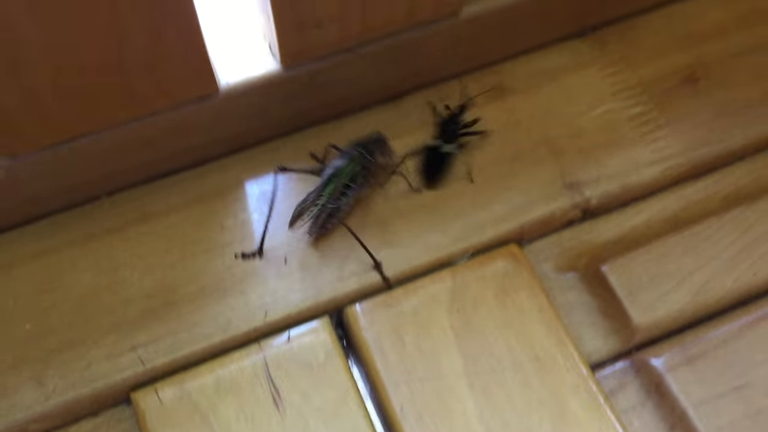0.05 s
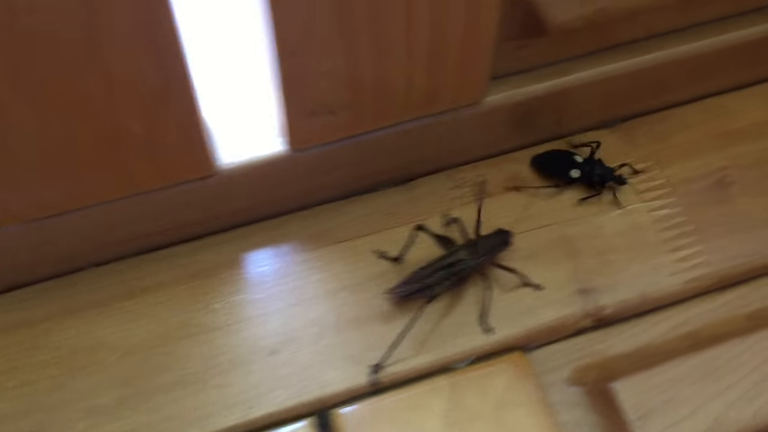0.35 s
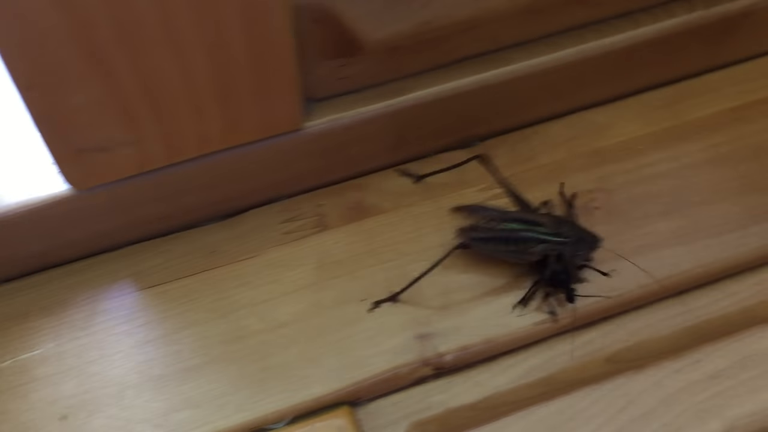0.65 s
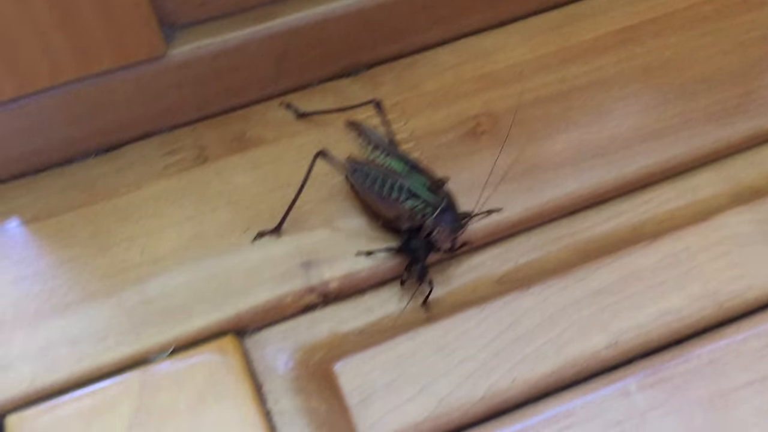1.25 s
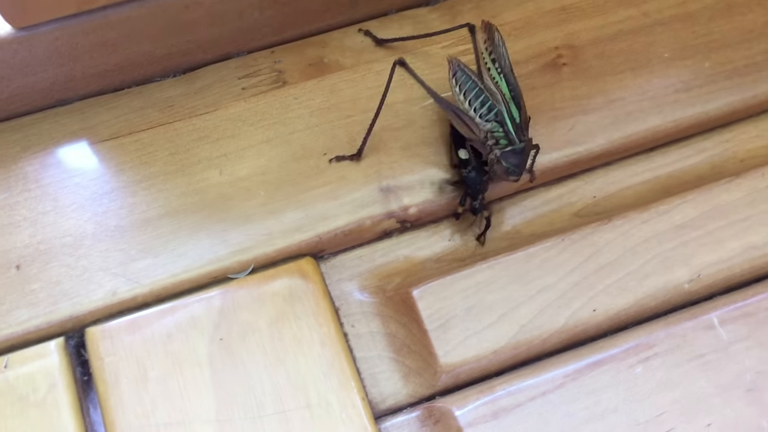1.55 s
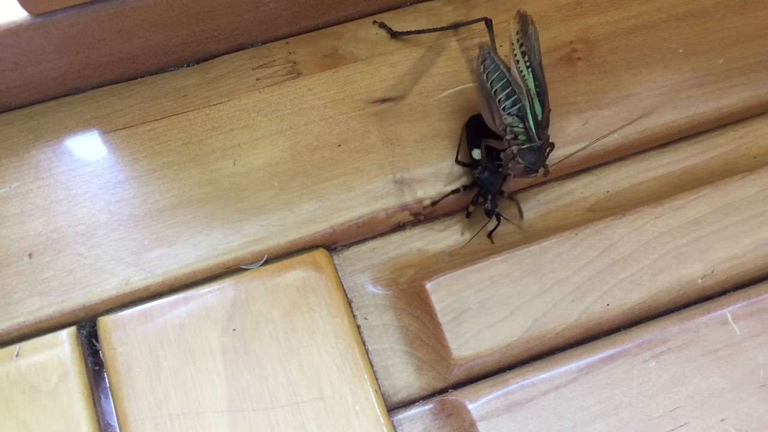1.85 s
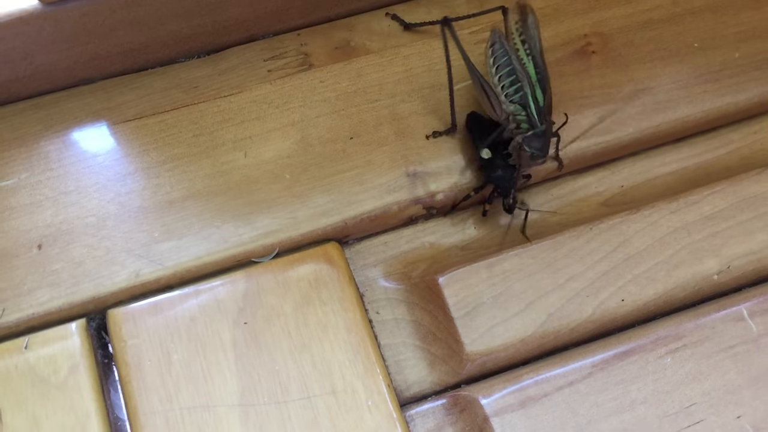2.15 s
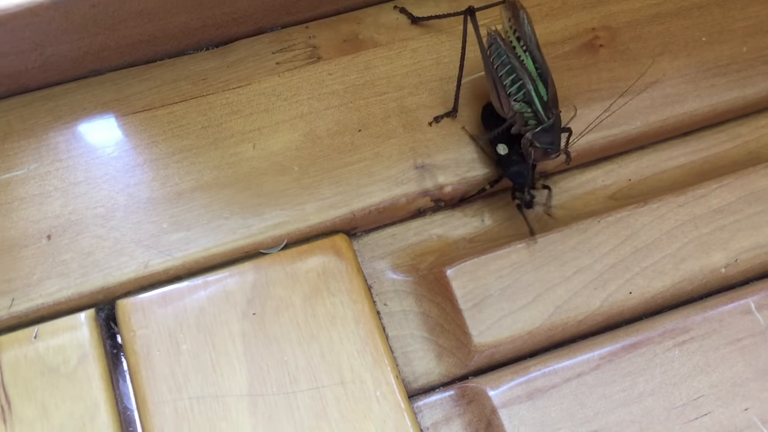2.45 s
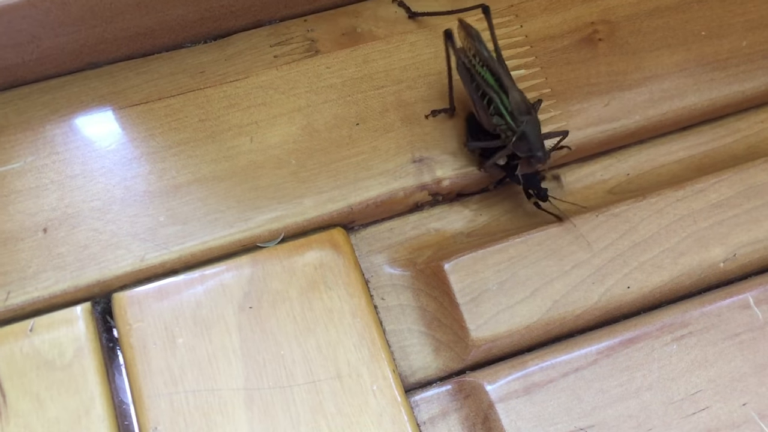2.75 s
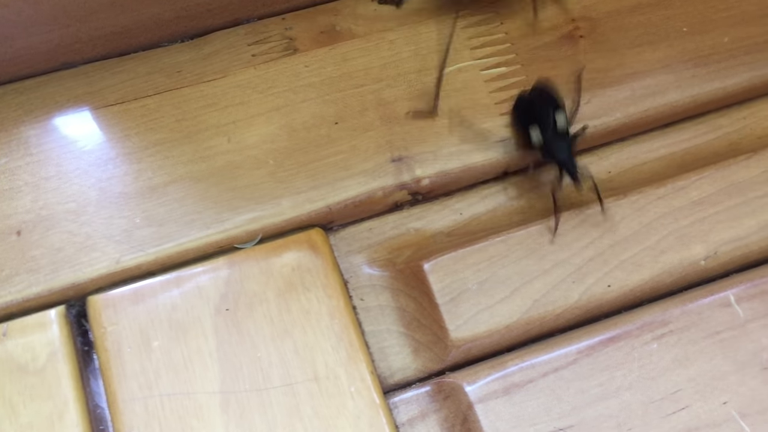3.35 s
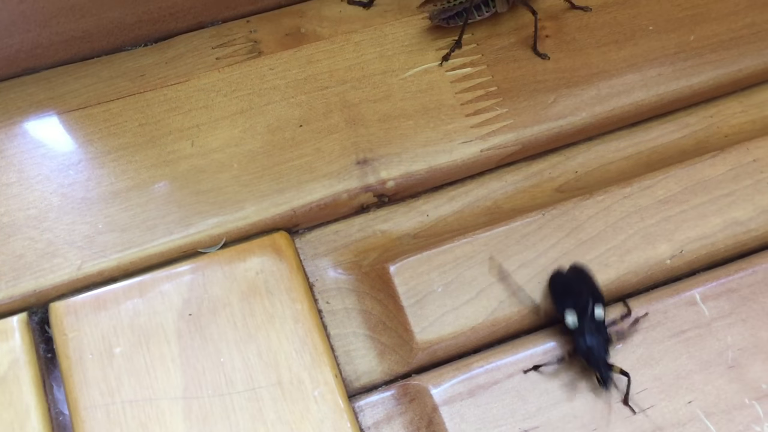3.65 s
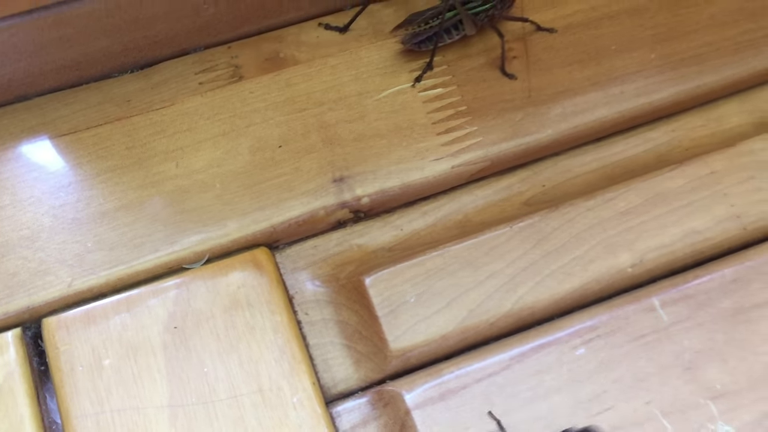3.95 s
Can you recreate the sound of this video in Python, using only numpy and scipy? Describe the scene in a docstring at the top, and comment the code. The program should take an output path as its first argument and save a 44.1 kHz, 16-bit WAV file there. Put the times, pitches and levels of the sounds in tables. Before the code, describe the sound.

Two insects tick, scrape and rustle against wooden boards, with two small knocks and background hiss.

```python
"""Two insects scuffle on wood

A bush cricket and a hard-shelled black insect scuffle on varnished wood in a quiet room.
Their shells rub and tick, their claws tap and scrape, and the boards ring with two knocks,
the fuller one near the end. Soft rustles and dull bumps of handling come and go over a steady hiss."""
import sys
import numpy as np
from scipy import signal
from scipy.fft import rfft, irfft, next_fast_len
from scipy.io import wavfile
from scipy.ndimage import uniform_filter1d, map_coordinates

SR = 44100
rng = np.random.default_rng(int(sys.argv[2]) if len(sys.argv) > 2 else 0)


def persist_wave(psi):
    """Save psi, clipped to +-1, as 16-bit WAV."""
    counts = np.round(np.clip(psi, -1, 1) * 32767).astype(np.int16)
    wavfile.write(sys.argv[1], SR, np.atleast_2d(counts).T)


N = 176400  # 4 seconds

# Levels are relative. A colour says how strong the low and high pitches of a sound are.
# t60 is the time a sound takes to fade by 60 dB.
# pitches that stand out in the hiss, rustle and rasp (f/Hz, width/Hz, lift/dB)
PEAKS = [(186, 20, 4), (790, 60, 3), (965, 50, 3), (1125, 60, 5), (1430, 70, 3), (1550, 70, 2),
         (1950, 110, 4.5), (2260, 90, 2.5), (2500, 130, 2.5), (3700, 330, 3.5), (4520, 240, 4),
         (5300, 170, 3), (5680, 160, 2), (11750, 300, 3), (13220, 250, 2)]
# colour of the background hiss (f/Hz, level/dB)
HISS_COLOUR = [(20, -15), (35, -1.5), (50, -6), (70, 6.5), (110, -1), (190, -1.5), (290, -9), (450, -12.5),
               (620, -13), (1100, -14.5), (1900, -11), (2900, -12.5), (3600, -3.5), (4600, -2.5), (6100, 0),
               (7000, -5), (7800, -13), (9200, -12), (10400, -23.5), (11500, -20), (15000, -32)]
# loudness of the rumble (t/s, level/dB) and its colour (f/Hz, level/dB)
ROOM_RUMBLE_LEVELS = [(0, -76), (.9, -76), (1.3, -61.5), (1.8, -72), (2.9, -76.5), (3.35, -62.5),
                      (3.6, -59.5), (4, -65.5)]
ROOM_RUMBLE_COLOUR = [(25, -30), (50, -5), (68, -4.5), (100, 3), (130, -14), (185, -3.5), (280, -25),
                      (900, -46.5)]
# faint low tones (t/s, length/s, f/Hz, level/dB)
FAINT_TONES = [(.3, 0.44, 476, -65.5), (1.2, 0.33, 471, -69), (1.95, 0.17, 460, -71.5)]
# loudness of the handling rustle (t/s, level/dB) and its colour (f/Hz, level/dB)
SLIDING_LEVELS = [(0, -62), (.04, -69), (.07, -58.5), (.17, -58), (.22, -56), (.27, -62), (.36, -56),
                  (.52, -57), (.57, -61), (.68, -54.5), (.8, -63.5), (.92, -64), (1.0, -53), (1.15, -51.5),
                  (1.24, -49.5), (1.305, -48.5), (1.35, -55), (1.48, -54), (1.68, -64.5), (1.77, -61.5),
                  (1.85, -74), (2.1, -62.5), (2.7, -62.5), (3.01, -67), (3.045, -52.5), (3.1, -59),
                  (3.145, -53), (3.22, -58.5), (3.36, -66), (3.43, -54), (3.54, -51.5), (3.66, -60),
                  (3.86, -56), (3.93, -64), (4, -71)]
SLIDING_COLOUR = [(100, -31.5), (300, -11), (470, -7.5), (620, -9), (800, -9.5), (1130, -4.5), (1550, -1),
                  (2250, -2.5), (2900, -4.5), (4000, -9.5), (7000, -12), (15000, -26.5)]
# brief rubbing squeaks (t/s, length/s, f/Hz, level/dB)
RUB_SQUEAKS = [(.045, 0.078, 967, -58), (0.049, 0.047, 1830, -58.5), (0.601, .05, 1340, -57),
               (.665, 0.046, 1065, -57.5), (0.936, 0.046, 1550, -54.5), (1.191, 0.058, 1336, -54),
               (3.411, 0.054, 1140, -60), (3.51, 0.038, 1600, -51.5), (3.55, 0.05, 1650, -60),
               (3.746, 0.26, 1880, -66)]
# dull handling bumps (t/s, peak level/dB) and their colour (f/Hz, level/dB)
THUDS = [(.07, -53), (0.126, -48), (.415, -50.5), (.483, -39.5), (0.517, -49), (0.682, -50.5), (.74, -52.5),
         (1.004, -47.5), (1.022, -44.5), (1.1, -45), (1.235, -49.5), (1.538, -51), (2.42, -49.5),
         (3.488, -43.5), (3.532, -44.5), (3.553, -43.5), (3.609, -50)]
THUD_COLOUR = [(25, -18), (65, 3), (210, 0.5), (320, -11), (600, -18.5), (1500, -55)]
# a foot dragging on varnish (t/s, length/s, level/dB) and its colour (f/Hz, level/dB)
FOOT_SCRAPES = [(3.03, 0.047, -60), (3.095, 0.068, -55.5), (3.152, 0.036, -60)]
FOOT_COLOUR = [(500, -20), (1200, -17), (1900, 2), (2600, 3), (3500, -3.5), (6000, -29)]
# blows on the wood, in close pairs of similar strength (t/s, level/dB), and the colour of the clunk (f/Hz,
# level/dB)
WOOD_KNOCKS = [(1.2869, -50), (1.2932, -48), (3.4732, -41.5), (3.4767, -41)]
WOOD_COLOUR = [(60, -14), (200, 4), (370, 9), (580, -16.5), (1100, 2.5), (2500, -2), (4500, -19)]
# pitches at which the wood rings (f/Hz, level/dB, t60/s)
WOOD_RINGS = [(191, -9, 0.36), (294, -10, 0.12), (366, -9.5, 0.083), (854, -8.5, 0.076), (1120, -4, 0.073),
              (1220, 0, 0.054), (1500, 3, .033), (2000, -3, 0.045), (2325, 4.5, 0.026), (3080, 6, .016)]
# claws hitting the boards (t/s, level/dB, tilt/dB per octave) and their colour (f/Hz, level/dB)
CLAW_TAPS = [(0.0288, -35, 3), (0.473, -36, -1), (1.2865, -20, -1), (1.293, -21.5, -2), (1.363, -36, 2),
             (1.547, -35.5, -8), (1.5733, -37, 8), (1.923, -36, -7), (2.184, -34, 8), (2.573, -33, 6),
             (3.047, -33, 4), (3.1515, -29.5, -7.5), (3.425, -28.5, -1.5), (3.4433, -33, 5),
             (3.4686, -29, 6), (3.4736, -25, -2), (3.698, -24.5, -5.5), (3.8816, -29, -5.5)]
CLAW_COLOUR = [(200, -41.5), (1200, -28), (1750, -27), (2150, -10.5), (3200, 0), (4800, -1.5), (6400, -5.5),
               (8000, -11), (11000, -20.5), (15000, -20)]
# loudness of shell rubbing on shell (t/s, level/dB) and its colour (f/Hz, level/dB)
SHELL_RASP_LEVELS = [(0, -75), (.9, -67), (1.1, -63), (1.22, -64), (1.34, -57), (1.44, -57.5), (1.48, -61),
                     (1.59, -55.5), (1.69, -61.5), (1.77, -56.5), (1.85, -61), (1.92, -54.5), (1.97, -64.5),
                     (2.02, -57.5), (2.07, -66.5), (2.17, -60.5), (2.23, -60.5), (2.28, -63), (2.32, -63),
                     (2.41, -59.5), (2.55, -62), (2.6, -56.5), (2.72, -62.5), (2.8, -72), (2.89, -58),
                     (3.0, -73), (3.5, -69), (4, -79)]
SHELL_RASP_COLOUR = [(1000, -27), (2800, 3.5), (4000, 9), (6000, 4), (7700, -2), (9000, 1.5), (10300, -4.5),
                     (11700, -2.5), (13000, 2), (15000, -1.5)]
# shell edges snapping free (t/s, level/dB, f/Hz)
SHELL_TICKS = [(1.1174, -31.5, 13800), (1.1786, -20, 14600), (1.2865, -15, 12200), (1.2866, -20, 8900),
               (1.5464, -31, 12600), (1.5733, -31, 13600), (1.633, -31, 13000), (1.6349, -28, 10700),
               (1.6872, -39, 9800), (1.7622, -27.5, 13500), (1.7804, -38, 13000), (1.7996, -36, 13000),
               (1.9225, -31, 14300), (2.0281, -40, 13000), (2.1516, -37, 14100), (2.1655, -38, 12000),
               (2.1734, -30.5, 12000), (2.3551, -31, 13500), (2.389, -28, 9000), (2.4034, -29.5, 12200),
               (2.407, -31, 13500), (2.4398, -34, 12600), (2.4691, -26.5, 12200), (2.471, -34, 13500),
               (2.575, -28.5, 8800), (2.5785, -28, 12100), (2.5882, -27.5, 11200), (2.666, -29.5, 13200),
               (2.9049, -36, 14000), (3.4436, -31, 12400), (3.473, -26.5, 9600)]


def amp(db):
    """Turn decibels into a number to multiply by."""
    return 10 ** (np.asarray(db) / 20)


def unit(x):
    """Scale a sound to an average strength (rms) of 1."""
    return x / np.sqrt(np.mean(x ** 2) + 1e-20)


def curve(rows):
    """Join (time, value) rows with straight lines, one value per sample."""
    return np.interp(np.arange(N) / SR, *np.transpose(rows))


def wobble(per_s):
    """A smooth curve through per_s random values a second."""
    points = rng.standard_normal(int(N * per_s / SR) + 4)
    return map_coordinates(points, [np.arange(N) * per_s / SR])


def fade(t, t60):
    """Die away by 60 dB every t60 seconds."""
    return np.exp(-np.log(1000) * t / t60)


def add(track, start, sound):
    """Mix a sound into a track, beginning at start seconds."""
    i = max(round(start * SR), 0)
    track[i:i + len(sound)] += sound[:len(track) - i]


def coloured(x, colour, tilt=0):
    """Give a sound a colour; a tilt above zero makes it brighter."""
    size = 2 * next_fast_len(len(x))
    octave = np.log2(np.fft.rfftfreq(size, 1 / SR) + 1)
    hz, db = np.transpose(colour)
    octaves_up = np.clip(octave - np.log2(hz[0]), 0, None)
    gain = amp(np.interp(octave, np.log2(hz), db) + tilt * octaves_up)
    # make the filter ring only after a hit, never before it
    cepstrum = irfft(np.log(gain))
    cepstrum[1:size // 2] *= 2
    cepstrum[size // 2 + 1:] = 0
    return irfft(rfft(x, size) * np.exp(rfft(cepstrum)))[:len(x)]


def resonant(x):
    """Make the pitches in PEAKS stand out."""
    f = np.fft.rfftfreq(N, 1 / SR)
    lift_db = sum(db / (1 + (2 * (f - hz) / width) ** 2) for hz, width, db in PEAKS)
    return unit(irfft(rfft(x) * amp(lift_db), N))


def patchy(x, depth_db, frames):
    """Let narrow bands of pitch swell and sink at random, for some frames (12 ms each) at a time."""
    bands = signal.stft(x, nperseg=1024)[2]
    swell = uniform_filter1d(rng.standard_normal(bands.shape), size=3, axis=0)
    swell = uniform_filter1d(swell, size=frames, axis=1)
    return unit(signal.istft(bands * amp(depth_db * unit(swell)))[1][:N])


def contact(t60, scatter_db):
    """One push, then a dying shiver as it scatters through the boards."""
    t = np.arange(SR // 4) / SR
    tail = rng.standard_normal(len(t)) * fade(t, t60)
    return (t == 0) + amp(scatter_db) * tail / np.linalg.norm(tail)


def grains(per_s, spread_db):
    """Tiny slips at random moments and of random size."""
    clicks = (rng.random(N) < per_s / SR) * rng.choice([-1, 1], N)
    return clicks * amp(spread_db * rng.standard_normal(N))


def hiss(level_db=-52.5):
    """A steady, slightly restless background hiss."""
    loudness = amp(level_db + 0.16 * wobble(13))
    noise = resonant(coloured(rng.standard_normal(N), HISS_COLOUR))
    return loudness * patchy(noise, depth_db=3, frames=8)


def rumble():
    """A low room rumble that swells twice, around the knocks."""
    return amp(curve(ROOM_RUMBLE_LEVELS)) * unit(coloured(rng.standard_normal(N), ROOM_RUMBLE_COLOUR))


def tones(waver_share=0.0304, flutter_db=4):
    """A thin, wavering tone fades in and out behind the scuffle."""
    out = np.zeros(N)
    for start, length, hz, db in FAINT_TONES:
        n = int(length * SR)
        pitch = hz * (1 + waver_share * wobble(42)[:n])
        tone = np.sin(2 * np.pi * np.cumsum(pitch) / SR)
        flutter = amp(flutter_db * wobble(25)[:n])
        add(out, start, amp(db) * unit(tone * flutter * signal.windows.tukey(n, 0.5)))
    return out


def rustle(boost_db=1):
    """Soft sliding: many tiny slips sound through a dull body whose colour keeps shifting."""
    slips = resonant(coloured(grains(per_s=3000, spread_db=0.5), SLIDING_COLOUR))
    sliding = patchy(slips, depth_db=4.5, frames=7)
    return sliding * amp(curve(SLIDING_LEVELS) + boost_db + 1.36 * wobble(60))


def squeaks(width_share=0.056):
    """Now and then the rubbing settles on a faint, rough pitch."""
    out, f = np.zeros(N), np.fft.rfftfreq(SR, 1 / SR)
    for start, length, hz, db in RUB_SQUEAKS:
        n = int(length * SR)
        near_pitch = 1 / (1 + ((f - hz) / (width_share * hz)) ** 2)
        squeak = irfft(rfft(rng.standard_normal(SR)) * near_pitch)[:n]
        add(out, start, amp(db) * unit(squeak * signal.windows.tukey(n, 0.5)))
    return out


def bumps(rise_s=0.011):
    """Handling makes soft, low thuds."""
    out, t = np.zeros(N), np.arange(SR // 4) / SR
    soft_start = 1 - 0.5 * np.exp(-t / rise_s)
    for start, db in THUDS:
        thud = coloured(contact(t60=0.15, scatter_db=0.5) * soft_start, THUD_COLOUR)
        add(out, start, amp(db) * thud / np.abs(thud).max())
    return out


def scrapes(peak_share=0.86):
    """A foot drags over the varnish in tiny slips, pressing harder and then letting go."""
    out = np.zeros(N)
    for start, length, db in FOOT_SCRAPES:
        n = int(length * SR)
        slips = coloured(grains(per_s=3500, spread_db=2)[:n], FOOT_COLOUR)
        pressure = np.interp(np.arange(n) / n, [0, peak_share, 1], [0, 1, 0])
        add(out, start, amp(db) * unit(slips * np.sqrt(pressure)))
    return out


def knocks(clunk_db=-4, rise_s=0.00014):
    """Two quick blows of similar strength make the wood ring over a dull clunk."""
    out, t = np.zeros(N), np.arange(SR // 3) / SR
    rise = 1 - np.exp(-t / rise_s)  # the board takes a moment to swing
    for start, db in WOOD_KNOCKS:
        ring = np.zeros(len(t))
        for hz, ring_db, t60 in WOOD_RINGS:
            strength = amp(ring_db + rng.normal(0, 1)) * rng.choice([-1, 1])
            ring += strength * np.sin(2 * np.pi * hz * t) * fade(t, t60)
        clunk = unit(coloured(rng.standard_normal(len(t)), WOOD_COLOUR)) * fade(t, t60=0.11)
        add(out, start, amp(db) * (ring + amp(clunk_db) * clunk) * rise)
    return out


def taps(boost_db=10):
    """Claws strike the varnish, some brightly and some dully."""
    out = np.zeros(N)
    for start, db, tilt in CLAW_TAPS:
        tap = coloured(contact(t60=0.042, scatter_db=-3.5), CLAW_COLOUR, tilt)
        add(out, start, amp(db + boost_db) * tap / np.linalg.norm(tap))
    return out


def rasp(boost_db=4.5):
    """Shells and spiny legs rub in a fine, unbroken crackle while the two insects wrestle."""
    slips = unit(grains(per_s=1800, spread_db=3))
    crackle = patchy(resonant(coloured(slips, SHELL_RASP_COLOUR)), depth_db=3, frames=4)
    return crackle * amp(curve(SHELL_RASP_LEVELS) + boost_db + 2 * wobble(50))


def ticks(fizz_db=-19.5):
    """A shell edge snaps free: a very short, high ring and a fizz of noise around its pitch."""
    out, t = np.zeros(N), np.arange(SR // 20) / SR
    for start, db, hz in SHELL_TICKS:
        ring = np.sin(2 * np.pi * hz * t) * fade(t, t60=0.0013)
        around_pitch = [(hz / 8, -22), (hz / 2, -11), (hz, 0), (hz * 2, -6)]
        fizz = unit(coloured(rng.standard_normal(len(t)), around_pitch)) * fade(t, t60=0.028)
        add(out, start, amp(db) * (ring + amp(fizz_db) * fizz))
    return out


def scene():
    """Add all the sounds together in one channel."""
    hits = ticks() + taps() + knocks() + bumps()
    rubbing = rustle() + squeaks() + scrapes() + rasp()
    background = tones() + hiss() + rumble()
    return (hits + rubbing + background)[None]


def record(dry, top_hz=15600):
    """Cut away everything higher than top_hz."""
    size = next_fast_len(N + SR // 2)
    kept = np.fft.rfftfreq(size, 1 / SR) < top_hz
    return irfft(rfft(dry, size) * kept, size)[..., :N]


dry = scene()
out = record(dry)
persist_wave(out)
```